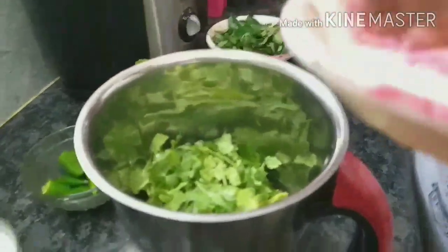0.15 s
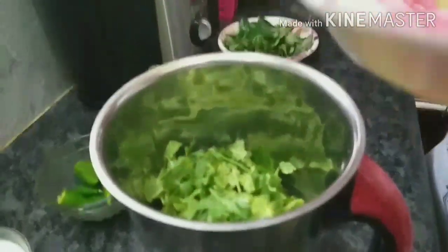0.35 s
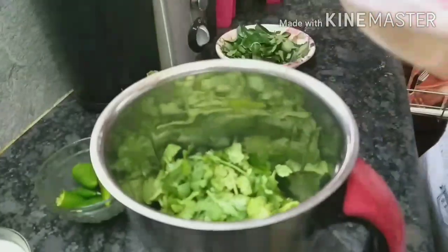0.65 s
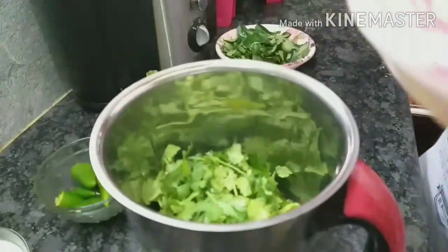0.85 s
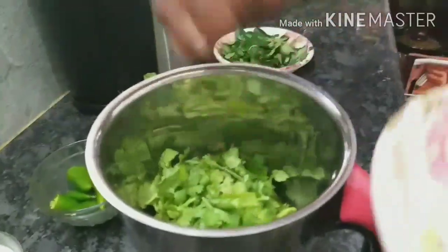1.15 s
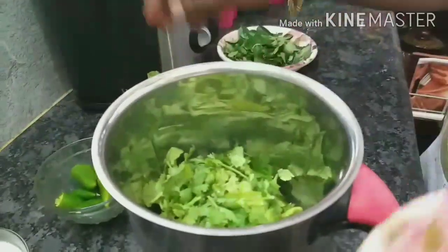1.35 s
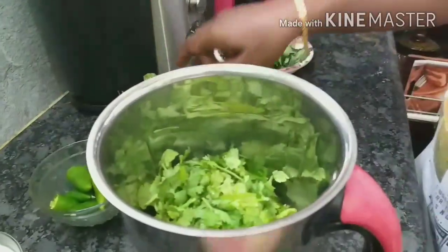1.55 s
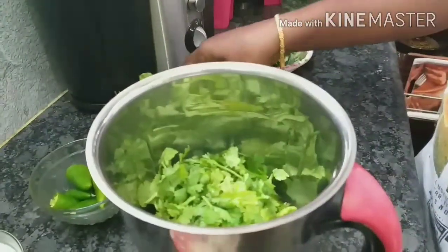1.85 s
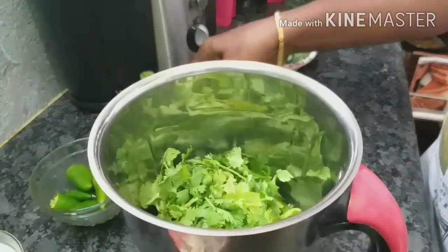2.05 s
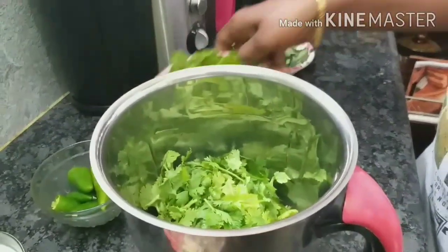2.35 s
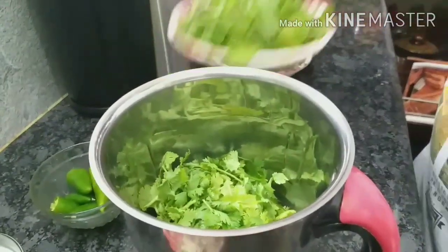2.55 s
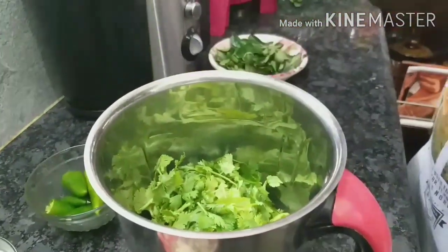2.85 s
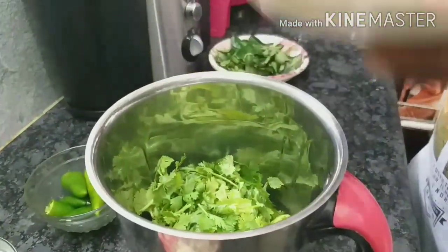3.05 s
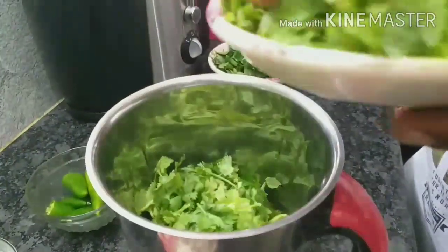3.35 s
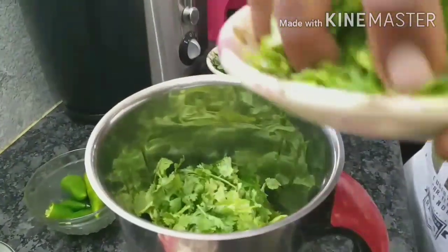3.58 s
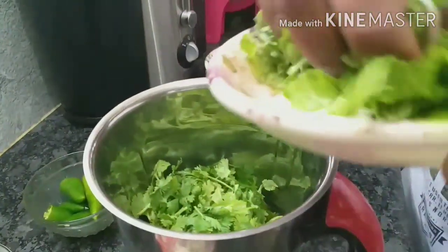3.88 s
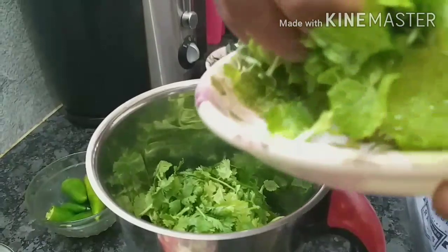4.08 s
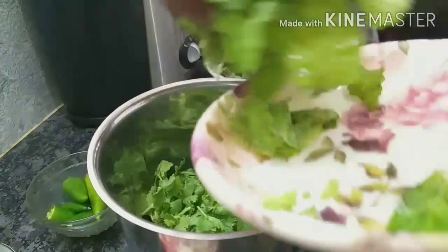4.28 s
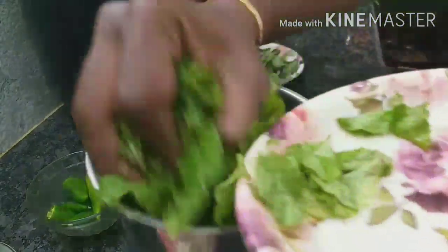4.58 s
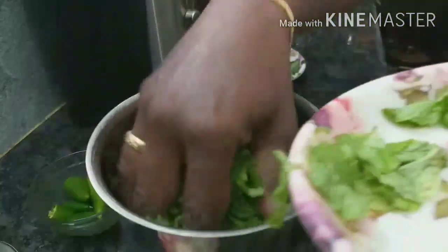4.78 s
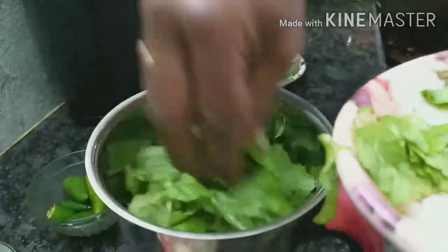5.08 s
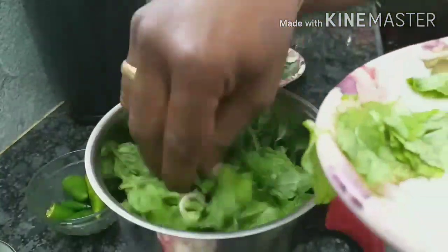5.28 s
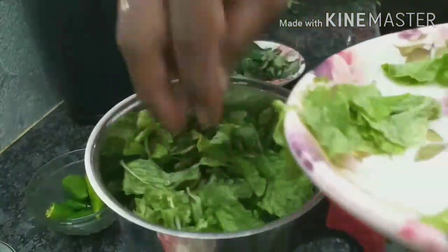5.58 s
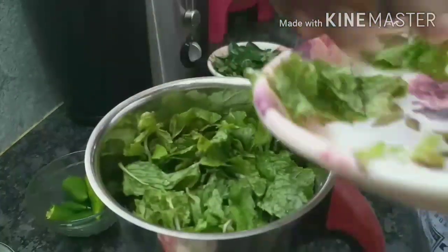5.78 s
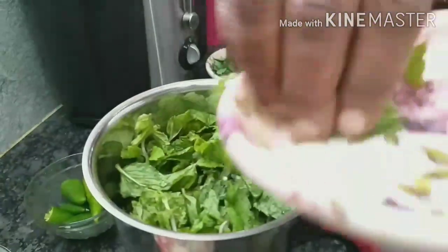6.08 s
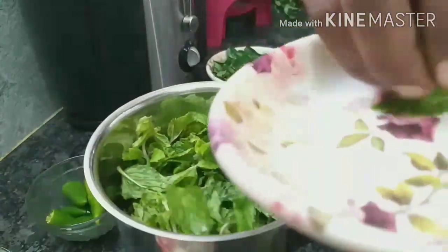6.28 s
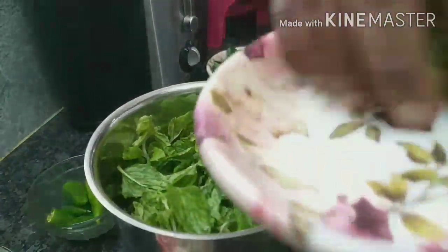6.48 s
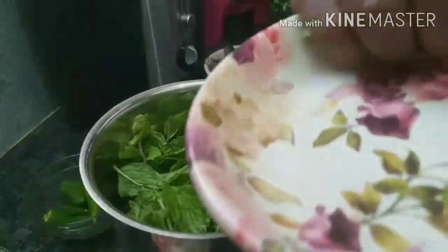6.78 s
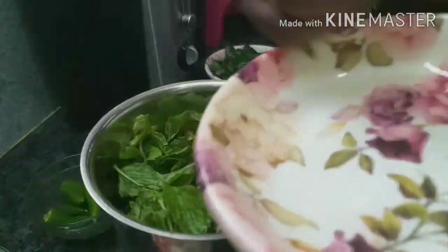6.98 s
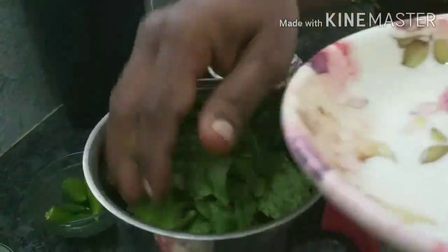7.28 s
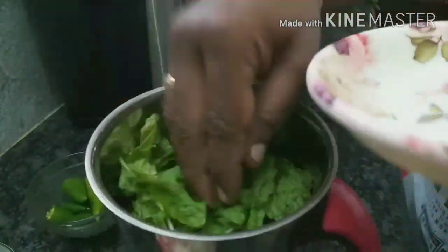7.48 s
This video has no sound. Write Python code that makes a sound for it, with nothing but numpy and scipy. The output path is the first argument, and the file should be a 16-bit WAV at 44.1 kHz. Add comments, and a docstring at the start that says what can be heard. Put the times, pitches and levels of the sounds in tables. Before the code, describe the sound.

Close in a small kitchen of tile and stone, a low hum and faint hiss lie under everything. At 0 s leaves rustle lightly with a thin wet edge, then fade. About 1 s a brief rub groans, sagging in pitch for under half a second. Around 1.95-2.0 s ceramic clinks rapidly, bright and short; a second, sharper cluster comes at 2.3 s, then a soft hollow bump at 2.6 s. The hum dips near 3 s. Rustling swells from 3.4 to 4 s. Faint contacts at 4.5-4.6 s lead into a dull, strong knock at 4.67 s and bright steel ticks at 4.83 s. From 5.5 s fingers swish across glaze, stems snap around 6 s, and the dragged plate rumbles at 6.2 s. More swishes and snaps come at 6.5-6.9 s, then light rustling and barely audible airy squeaks to 7.6 s.

```python
"""Small kitchen, stone counter: herbs move from a ceramic plate to a steel jar, heard in stereo.
Leaves rustle from the start as damped noise grains; a rub groans at 1 s through sagging resonances. Ringing modes
clink in clusters near 2 and 2.3 s; the low hum dips near 3 s. At 4.5 s plate and jar meet again, with steel ticks
of dense noise and a knock. From 5.5 s fingers sweep the glaze, stems snap and the dragged plate rumbles.
Filtered-noise whistles and squeaks come and go; dense echoes of tile and stone surround the direct sound."""
import sys
import numpy as np
from scipy import signal
from scipy.fft import rfft, irfft, next_fast_len
from scipy.io import wavfile
from scipy.ndimage import uniform_filter1d

SR = 44100
rng = np.random.default_rng(int(sys.argv[2]) if len(sys.argv) > 2 else 0)


def unload_audio(sound):
    """Save the sound as a 16-bit wav file, at the path given as the first command line argument."""
    columns = np.transpose(np.atleast_2d(sound))
    # keep every value between -1 and 1, then stretch to whole-number steps
    steps = np.round(np.clip(columns, -1, 1) * 32767)
    wavfile.write(sys.argv[1], SR, steps.astype(np.int16))


N = 336483
TIME = np.arange(N) / SR  # s
AGE = np.arange(SR * 3 // 5) / SR  # s since a contact; single contacts stop after 0.6 s


# Plate contacts: t/s, level/dB before level_db, then zone levels/dB relative to it: body, first bending
# modes, second modes, upper modes, top; ring time factor (small when gripped)
PLATE_CONTACTS = [(1.9473, 0, -34.5, -6.5, -18.5, -12.5, -22.5, 0.62),
                  (1.9829, 0, -31, -10.5, -21, -12.5, -22.5, 0.42),
                  (2.0026, -4, -27, -7, -18.5, -14.5, -23, 0.4),
                  (2.014, -13.5, -23.5, -8, -18, -16.5, -28, 0.11),
                  (2.3052, -6, -36, -16, -6.5, -7, -20.5, 0.32),
                  (2.3423, -21, -23.5, -11.5, -4.5, -13, -18, 0.82),
                  (2.3448, 2.5, -35, -16, -1, -9, -12.5, 0.23),
                  (2.357, -14, -13, -21.5, -13.5, -12.5, -4.5, 0.31),
                  (2.3627, -6, -23, -19, -10.5, -8.5, -20, 0.66),
                  (4.4703, -16, -6.5, -22, -17, -23, -30.5, 1.11),
                  (4.6174, -5, -12, -26.5, -22, -22, -24.5, 0.37)]
# Frequencies that divide the five zones: f/Hz
ZONE_EDGES = [1200, 2050, 3050, 6300]
# Modes of plate and jar: f/Hz, level/dB, t60/s before the ring time factor
DISH_MODES = [(245, -16, 0.079), (322, -16.5, 0.12), (390, -10.5, 0.14), (480, -14, 0.077),
              (543, -3, 0.094), (596, -5, 0.2), (652, -7.5, 0.13), (700, -2.5, 0.076), (900, -4.5, .05),
              (1122, -5.5, 0.07), (1379, -.5, .17), (1410, -1.5, .14), (1487, .5, .13), (1540, -5, .15),
              (1632, -7, .11), (1741, -8, .14), (1849, -15, .12), (2228, -14, .09), (2282, -12, .09),
              (2378, -2, .12), (2419, -5, .1), (2602, -10, .11), (2722, -11, .09), (3262, -11.5, .09),
              (3530, -6.5, .05), (3714, -1, 0.07), (4222, -8.5, .09), (4850, -4, 0.027), (4896, -6, 0.12),
              (5610, -5.5, .06), (6864, -1.5, .06), (8120, -4.5, .05), (9090, -3.5, 0.05),
              (10210, -6, 0.05)]
# Dry crack of a contact, before it is tilted by the zone levels: f/Hz, level/dB per Hz
CRACK_SPECTRUM = [(60, -22), (300, -9.5), (700, -7), (1500, 5.5), (2800, -1.5), (5000, 3), (6300, -2),
                  (9000, -7), (12000, -13), (15500, -27.5)]


def clinks(level_db=-4.5, crack_db=3.0, crack_t60=0.029, scatter_db=2.5, contact_s=.0003,
           low_cut_hz=150, clank=1.1, clank_t60=.025):
    """Each contact rings all modes; where it lands decides how strongly each zone of modes answers."""
    mode_hz, mode_db, mode_t60 = np.transpose(DISH_MODES)
    zone = np.searchsorted(ZONE_EDGES, mode_hz)
    zone_centres_hz = [700, 1500, 2400, 4500, 9000]
    signs = (-1) ** np.arange(len(mode_hz))  # neighbouring modes swing in opposite directions
    pressed = 1 + clank * dying(clank_t60)  # the swing sounds louder while the surfaces still touch, the counter radiating too
    onset = 1 - np.exp(-AGE / contact_s)
    out = np.zeros(N)
    for s, contact_db, *zone_db, ring_factor in PLATE_CONTACTS:
        scatter = rng.normal(0, scatter_db, len(mode_hz))
        strengths = signs * from_db(mode_db + np.array(zone_db)[zone] + scatter)
        ring = 0
        for strength, hz, t60 in zip(strengths, mode_hz, mode_t60):
            ring = ring + strength * np.sin(2 * np.pi * hz * AGE) * dying(t60 * ring_factor)
        # the crack is as bright as the blow
        zone_curve = list(zip(zone_centres_hz, zone_db))
        crack_colour = [(hz, db + .5 * at_hz(zone_curve, hz)) for hz, db in CRACK_SPECTRUM]
        crack = colour(rng.standard_normal(len(AGE)), crack_colour) * dying(crack_t60)
        crack = from_db(crack_db + zone_db[3]) * crack
        add(out, s, from_db(contact_db + level_db) * (pressed * ring + crack) * onset)
    return high_pass(out, low_cut_hz)


# Bright ticks of the steel wall, mostly from the finger ring: t/s, level/dB, t60/s
STEEL_TICKS = [(4.4705, -42.5, 0.13), (4.53, -23.5, 0.036), (4.541, -27, 0.0647), (4.6174, -23.5, 0.035),
               (4.817, -36, 0.041), (4.831, -11.5, 0.046), (4.8355, -14.5, .025)]
# Spectrum of the ticking steel: f/Hz, level/dB per Hz
STEEL_SPECTRUM = [(500, -19.5), (1700, -17), (3400, -17.5), (4400, -2), (5500, 0), (6600, -10), (8200, -10),
                  (9300, 2.5), (11500, -3), (13200, -5), (15800, -15.5)]


def ring_ticks(rise_s=0.0015):
    """Metal on thin steel: very dense high modes, made as a burst of coloured noise."""
    out = np.zeros(N)
    for s, db, t60 in STEEL_TICKS:
        burst = colour(rng.standard_normal(len(AGE)), STEEL_SPECTRUM)
        add(out, s, from_db(db) * burst * dying(t60) * (1 - np.exp(-AGE / rise_s)))
    return out


# Soft bumps of hand and jar: t/s, level/dB, f/Hz, t60/s, rise/s, share of dull puff (0 to 1)
SOFT_BUMPS = [(0.001, -57, 450, 0.18, 0.0012, 0.9), (0.71, -52.5, 530, 0.035, 0.00086, 1),
              (0.973, -41.5, 115, 0.042, 0.0027, 0.16), (1.665, -49.5, 680, 0.36, 0.016, 0.66),
              (1.887, -53, 216, 1, 0.012, 1), (1.946, -47, 105, 0.26, 0.0044, 0.9),
              (2.347, -49.5, 94.8, 0.1, 0.0027, 0.67), (2.614, -30, 406.6, 0.118, 0.0086, 0.33),
              (2.675, -50, 150, 0.11, .004, 0.46), (4.472, -45.5, 141, 0.09, .002, 1),
              (4.619, -42.5, 240, 0.065, .002, 0.49), (4.665, -8.5, 506, 0.023, 0.0011, 0.17),
              (4.668, -22.5, 235.8, 0.09, 0.0085, 0.15), (4.675, -32, 451, 0.052, .002, 0.63),
              (6.194, -37.5, 86, 0.49, 0.037, 0.14)]


def bumps(relative_width=0.61):
    """A padded contact: one damped low mode in a dull puff."""
    out = np.zeros(N)
    for s, db, hz, t60, rise_s, puff_share in SOFT_BUMPS:
        puff_share = np.clip(puff_share, 0, 1)
        mode = np.sin(2 * np.pi * hz * AGE)
        puff = resonant_noise(hz, relative_width * hz, len(AGE))
        body = (1 - puff_share) * mode + puff_share * puff
        add(out, s, from_db(db) * body * dying(t60) * (1 - np.exp(-AGE / rise_s)))
    return out


# Stems that snap: t/s, level/dB before level_db, centre f/Hz
STEM_SNAPS = [(.33, -53, 9800), (3.591, -39, 10300), (3.822, -47, 5160), (4.674, -28, 2400),
              (5.904, -30.5, 7400), (6.007, -34, 4950), (6.025, -29.5, 10800), (6.062, -31, 8650),
              (6.183, -33.5, 3930), (6.667, -33.5, 5100), (6.698, -32, 9050), (6.804, -45, 4260),
              (6.828, -33.5, 4900), (6.842, -35.5, 4570)]


def snaps(level_db=-4, t60=0.031, relative_width=0.39):
    """Stems crack in short broad bursts of resonant noise."""
    out = np.zeros(N)
    for s, db, hz in STEM_SNAPS:
        burst = resonant_noise(hz, relative_width * hz, len(AGE))
        add(out, s, from_db(db + level_db) * burst * dying(t60))
    return out


# Moves of the hand in the herbs: start t/s, swell/s, fade t60/s, then level/dB of leaf rustle,
# fingers sweeping and fine wet hiss, each before its layer's gain
HAND_STROKES = [(0.0, 0.002, 0.39, -51, -55.5, -45.5), (0.1, .14, 2, -69, -75, -60),
                (0.31, 0.027, 0.53, -67.5, -74, -57), (0.5, 0.018, 2.7, -90.5, -77.5, -67),
                (0.93, 0.052, 0.15, -66, -104, -63), (1.005, 0.02, 0.39, -66.5, -83, -59),
                (1.37, .1, 2, -70, -71, -73), (1.79, 0.11, 1.25, -52, -45, -55.5),
                (2.1, 0.097, 2.4, -56.5, -63, -74.5), (2.595, .028, 0.19, -50, -48, -55),
                (2.86, 0.053, 0.22, -96, -94, -78), (3.27, .06, 0.33, -70.5, -75, -70),
                (3.44, 0.057, 0.12, -62, -62, -62), (3.31, 0.42, 1.32, -49.5, -50.5, -48),
                (4.28, .16, 1.0, -76.5, -84, -60), (4.62, .08, 1.7, -55.5, -58, -54),
                (4.98, 0.2, 2.4, -61.5, -66.5, -58), (5.6, 0.14, .45, -88, -90, -39),
                (5.45, 0.5, 0.72, -51, -39.5, -48), (5.97, 0.058, .4, -50.5, -72, -42),
                (6.08, 0.084, 0.77, -49.5, -52.5, -50.5), (6.33, .14, 3, -65, -67.5, -59.5),
                (6.52, 0.11, 0.65, -80, -49, -47.5), (6.7, .14, 0.49, -57, -60.5, -46),
                (7.215, 0.036, 0.4, -58, -64, -56), (7.3, .03, 0.16, -65, -63, -73),
                (7.47, 0.029, .5, -66, -76, -66)]
# The hand drags the plate: start t/s, swell/s, fade t60/s, level/dB
PLATE_DRAGS = [(5.84, 0.1, 2.6, -55), (6.14, .06, 0.4, -42), (6.42, 0.051, 0.54, -86)]
# Leaf rustle: f/Hz, level/dB per Hz
LEAF_SPECTRUM = [(250, -9), (600, -8.5), (1100, -1.5), (1900, -3), (2700, -1.5), (4500, 4), (7000, 1.5),
                 (9000, 7.5), (11000, -1), (15000, -7)]
# Fingers sweeping the glaze: f/Hz, level/dB per Hz
SWEEP_SPECTRUM = [(2500, -34.5), (3400, -7.5), (4100, 1.5), (4900, 3.5), (5600, -0.5), (6600, -19.5),
                  (9000, -44)]
# Fine wet hiss: f/Hz, level/dB per Hz
HISS_SPECTRUM = [(7500, -38), (9600, 2.5), (11500, 5.5), (12700, -1), (13500, -8.5), (15500, -11.5)]
# Rubbing stalks: f/Hz, level/dB per Hz
RUB_SPECTRUM = [(900, -12), (1400, -12), (1700, 0.5), (2000, 2), (2400, -8), (3200, -24.5)]
# Rumble of the dragged plate: f/Hz, level/dB per Hz
DRAG_SPECTRUM = [(60, -24), (86, 6.5), (135, -17), (200, -2), (350, -1.5), (480, -9.5), (800, -10.5),
                 (1300, -15.5), (2500, -19), (4000, -23.5)]


def herbs(leaf_db=0.0, sweep_db=-2, hiss_db=-4.0, drag_db=0, rub_db=-10, tick_db=-11,
          clump_db=2.5, lurch_db=0.5):
    """Leaves crackle in clumps, stalks rub and tick, fingers swish on glaze and drag the plate unevenly."""
    leaf, sweep, hiss = swells(HAND_STROKES)
    drag = swells(PLATE_DRAGS)[0] * from_db(lurch_db * resonant_noise(15.4, 31.7, N))
    clumps = from_db(clump_db * resonant_noise(25, 60, N))
    crackle = clumps * grains(per_s=900, spread_db=3.0, smooth=.6)
    friction = grains(per_s=5000, spread_db=6.0, smooth=0.92)
    wet = grains(per_s=1400, spread_db=7.5, smooth=.9)
    stalk_ticks = grains(per_s=160, spread_db=2.5, smooth=0)
    rumble = grains(per_s=440, spread_db=0.0, smooth=1.0)
    return (from_db(leaf_db) * leaf * colour(crackle, LEAF_SPECTRUM)
            + from_db(sweep_db) * sweep * colour(friction, SWEEP_SPECTRUM)
            + from_db(hiss_db) * hiss * colour(wet, HISS_SPECTRUM)
            + from_db(rub_db) * leaf * colour(friction, RUB_SPECTRUM)
            + from_db(tick_db) * leaf * colour(stalk_ticks, LEAF_SPECTRUM)
            + from_db(drag_db) * drag * colour(rumble, DRAG_SPECTRUM))


def swells(rows):
    """One gain curve per dB column: every move gathers speed evenly, then dies away."""
    age = np.arange(2 * SR) / SR
    curves = np.zeros((len(rows[0]) - 3, N))
    for s, swell_s, fade_t60, *levels_db in rows:
        rise = np.minimum(age / swell_s, 1) ** 2
        fade = np.exp(-np.log(1000) * np.maximum(age - swell_s, 0) / fade_t60)
        for curve, db in zip(curves, levels_db):
            add(curve, max(s, 0), from_db(db) * rise * fade)
    return curves


def grains(per_s, spread_db, smooth):
    """Tiny clicks of uneven size over smooth friction noise."""
    sizes = from_db(spread_db * np.minimum(rng.exponential(1, N), 4)) * rng.choice([-1, 1], N)
    clicks = sizes * (rng.random(N) < per_s / SR)
    return rms_one(clicks) + smooth * rng.standard_normal(N)


# One rub, pressed hardest before its middle: start and length in s, share of the length at its peak
GROAN_START_S, GROAN_LENGTH_S, GROAN_PEAK_SHARE = 1.005, .41, 0.27
# Lower resonances of the rub: f/Hz, width/Hz, level/dB within the group, share of pitch lost as it slows
LOW_GROAN_MODES = [(603, 29, 5, 0.008), (530, 120, -4, 0.2), (790, 120, -14.5, .05), (973, 68, -14.5, .04)]
# Upper resonances of the rub: f/Hz, width/Hz, level/dB within the group, share of pitch lost as it slows
HIGH_GROAN_MODES = [(1823, 40, 2, 0.0205), (1900, 160, -5.5, 0.24), (2420, 330, -19.5, 0.022)]


def groan(low_db=-46.0, high_db=-53, low_growth=0.59, high_growth=1.9, evenness_s=0.025, waver_db=1.1):
    """A rub feeds two resonance groups that sag in pitch as it slows; the upper one needs more pressure."""
    slowing = np.clip((TIME - GROAN_START_S) / GROAN_LENGTH_S, 0, 1)
    pressure = np.sin(np.pi / 2 * np.interp(slowing, [0, GROAN_PEAK_SHARE, 1], [0, 1, 0]))
    groups = ((low_db, low_growth, LOW_GROAN_MODES), (high_db, high_growth, HIGH_GROAN_MODES))
    out = 0
    for level_db, growth, modes in groups:
        tone = 0
        for hz, width_hz, db, sag in modes:
            noise = resonant_noise(hz, width_hz, N)
            position = np.cumsum(1 - sag * slowing)  # reading the noise more slowly lowers its pitch
            tone = tone + from_db(db) * np.interp(position, np.arange(N), noise)
        # dividing by the running level leaves the swell to the pressure
        running_level = np.sqrt(uniform_filter1d(tone ** 2, int(evenness_s * SR) + 1) + 1e-9)
        out = out + from_db(level_db) * pressure ** growth * tone / running_level
    return out * from_db(waver_db * resonant_noise(16, 25, N))


# Thin whistles and squeaks: start t/s, length/s, f/Hz, width/Hz, level/dB
THIN_TONES = [(0.54, 0.21, 972, 59.6, -66), (0.736, 0.21, 954, 60, -73), (2.119, .19, 2490, 107.5, -50),
              (2.596, .17, 1010, 87.9, -65.5), (3.05, .55, 1003, 60, -81), (3.749, 0.45, 1850, 451.5, -64),
              (4.247, 0.32, 1234, 70, -70.5), (4.917, 0.32, 1080, 70, -69), (5.192, 0.075, 13950, 170, -64),
              (5.486, 0.085, 3910, 120, -65), (6.719, 0.24, 934, 50.3, -75), (6.936, 0.23, 3800, 446, -71),
              (7.001, 0.24, 942, 45, -68.5), (7.07, 0.32, 1850, 303, -62.5),
              (7.391, 0.26, 1985, 101.3, -66)]


def whistles():
    """Faint tones, blurred as narrow resonant noise, swell and fade."""
    out = np.zeros(N)
    for s, length_s, hz, width_hz, db in THIN_TONES:
        size = int(length_s * SR)
        arch = np.sin(np.pi * np.arange(size) / size)
        add(out, s, from_db(db) * resonant_noise(hz, width_hz, size) * arch)
    return out


def wall_echo(x, delay_s=0.015, echo_db=-11, dull_hz=3200):
    """One dull return from the wall behind the counter."""
    late = np.interp(TIME - delay_s, TIME, x, left=0)
    return from_db(echo_db) * signal.sosfilt(signal.butter(1, dull_hz, fs=SR, output="sos"), late)


# Decay of the small kitchen: f/Hz, t60/s
ROOM_T60 = [(100, 0.69), (500, 0.27), (1500, 0.34), (4000, 0.33), (8000, 0.24), (15000, 0.3)]


def kitchen(x, first_echo_s=0.0029, build_s=.006):
    """Dense echoes off tile and stone, each band dying at its own rate; unit energy."""
    edges_hz = np.geomspace(50, 18000, 10)
    tail = 0
    for low, high in zip(edges_hz, edges_hz[1:]):
        band_pass = signal.butter(2, [low, high], "band", fs=SR, output="sos")
        band = signal.sosfilt(band_pass, rng.standard_normal(len(AGE)))
        tail = tail + band * dying(at_hz(ROOM_T60, np.sqrt(low * high)))
    tail = tail * (1 - np.exp(-np.maximum(AGE - first_echo_s, 0) / build_s))
    return signal.fftconvolve(x, tail / np.linalg.norm(tail))[:N]


# Level of hum and hiss together, with a dip near 3 s: t/s, level/dB
HUM_CURVE = [(0, -72), (2.6, -68.5), (2.95, -84), (3.3, -81.5), (3.7, -70), (7.6, -70.5)]
# Low hum: f/Hz, level/dB per Hz
HUM_SPECTRUM = [(40, -29.5), (85, -3.5), (130, 1), (190, -13), (500, -15.5), (1000, -19.5), (2000, -16),
                (4000, -32)]
# Faint room hiss: f/Hz, level/dB per Hz
ROOM_HISS_SPECTRUM = [(30, -15), (120, -6.5), (210, -24), (500, -22.5), (1000, -20), (2300, -24.5),
                      (3000, -26.5), (5000, -17.5), (7500, -30.5), (10000, -18), (15800, -31.5)]
HISS_UNDER_HUM_DB = -6.5  # relative to the hum


def background():
    """A low hum and a faint hiss, both coloured noise, sink and recover together."""
    level = from_db(np.interp(TIME, *np.transpose(HUM_CURVE)))
    hum = colour(rng.standard_normal(N), HUM_SPECTRUM)
    hiss = colour(rng.standard_normal(N), ROOM_HISS_SPECTRUM)
    return level * (hum + from_db(HISS_UNDER_HUM_DB) * hiss)


# Balance of the two channels: f/Hz, left minus right level/dB
CHANNEL_BALANCE = [(500, 0), (1000, .2), (1450, 1.1), (2400, .6), (3500, 0), (6000, -.2), (8500, -1.3),
                   (11000, -.1)]
# Phase between the channels: f/Hz, lead of the left channel/radians
CHANNEL_LEAD = [(1000, 0), (1500, .14), (2300, -.14), (3200, 0), (7500, 0), (9200, -.25), (10200, .08),
                (12000, 0)]


def stereo(x):
    """Left and right channels differ slightly in level and phase across the spectrum."""
    size = next_fast_len(N)
    hz = np.arange(size // 2 + 1) * SR / size
    half = np.array([[.5], [-.5]])  # left and right share each difference
    gain = from_db(half * at_hz(CHANNEL_BALANCE, hz))
    turn = np.exp(1j * half * np.interp(hz, *np.transpose(CHANNEL_LEAD)))
    return irfft(rfft(x, size) * gain * turn, size)[:, :N]


def from_db(db):
    """Decibels to gain."""
    return 10 ** (np.asarray(db) / 20)


def rms_one(x):
    """Scale to unit power."""
    return x / np.sqrt(np.mean(x ** 2) + 1e-20)


def at_hz(points, hz):
    """Read a table on a log-frequency axis."""
    f, value = np.transpose(points)
    return np.interp(np.log(np.maximum(hz, 1)), np.log(f), value)


def colour(x, spectrum):
    """Give a signal a smooth spectrum that falls away below its first point; rms 1."""
    size = next_fast_len(len(x))
    hz = np.arange(size // 2 + 1) * SR / size
    low_end = np.minimum(hz / spectrum[0][0], 1) ** 2
    gain = from_db(at_hz(spectrum, hz)) * low_end
    return rms_one(irfft(rfft(x, size) * gain, size)[:len(x)])


def resonant_noise(hz, width_hz, size):
    """Noise twice through one resonance; rms 1."""
    r = np.exp(-np.pi * width_hz / SR)
    b, a = [1 - r, 0, r - 1], [1, -2 * r * np.cos(2 * np.pi * hz / SR), r * r]
    once = signal.lfilter(b, a, rng.standard_normal(size))
    return rms_one(signal.lfilter(b, a, once))


def dying(t60):
    """Exponential decay by 60 dB in t60 seconds."""
    return np.exp(-np.log(1000) * AGE / max(t60, 1e-3))


def add(track, s, sound):
    """Mix a sound in at a time in seconds."""
    i = round(s * SR)
    track[i:i + len(sound)] += sound[:N - i]


def high_pass(x, hz):
    """Remove the bass, which small bodies hardly radiate."""
    return signal.sosfilt(signal.butter(3, hz, "high", fs=SR, output="sos"), x + 1e-18)


def scene(clink_room_db=-4, tick_room_db=-4, bump_room_db=-7, leaf_room_db=-12, groan_room_db=-9,
          side_db=-29, tick_cut_hz=200, bump_cut_hz=60, side_cut_hz=1200):
    """All sources in one room, in two channels that share the same bass."""
    plate, leaves, rub = clinks(), herbs(), groan()
    ticks = high_pass(ring_ticks() + snaps(), tick_cut_hz)
    thuds = high_pass(bumps(), bump_cut_hz)
    sent = (from_db(clink_room_db) * plate + from_db(tick_room_db) * ticks
            + from_db(bump_room_db) * thuds + from_db(leaf_room_db) * leaves
            + from_db(groan_room_db) * rub)
    direct = plate + ticks + thuds + leaves + rub + whistles()
    mid = direct + wall_echo(plate) + kitchen(sent) + background()
    side = from_db(side_db) * high_pass(kitchen(sent), side_cut_hz)  # opposite in the two channels
    return stereo(mid) + side * np.array([[1], [-1]])


CUTOFF_HZ = 15800


def record(dry):
    """The loudest peaks are rounded and the top is cut."""
    rounded = dry / (1 + dry ** 4) ** .25
    low_pass = signal.ellip(10, .1, 80, CUTOFF_HZ, fs=SR, output="sos")
    return signal.sosfilt(low_pass, rounded)


dry = scene()
out = record(dry)
unload_audio(out)
```